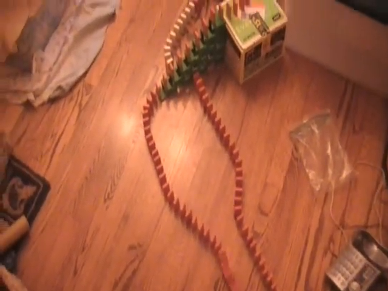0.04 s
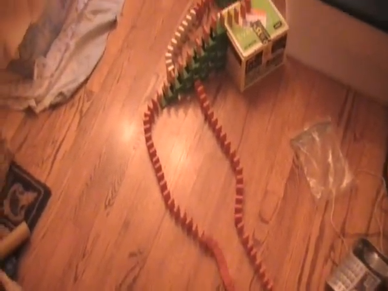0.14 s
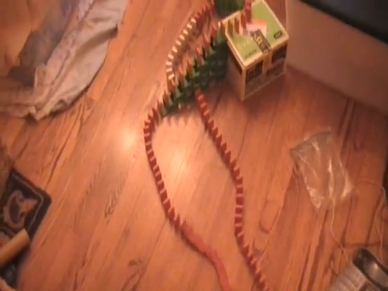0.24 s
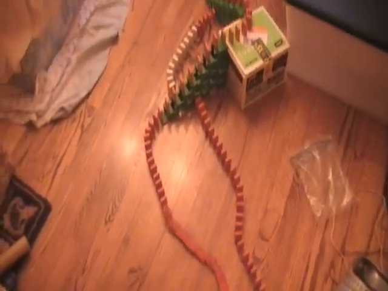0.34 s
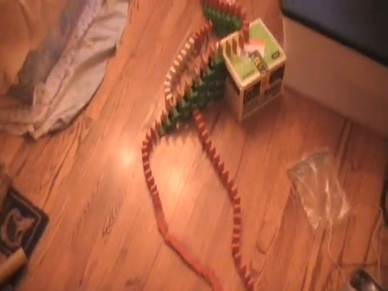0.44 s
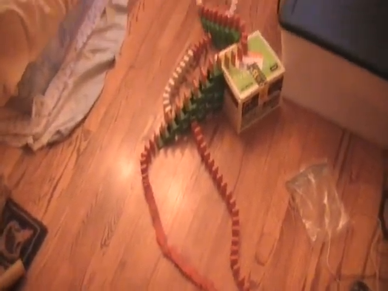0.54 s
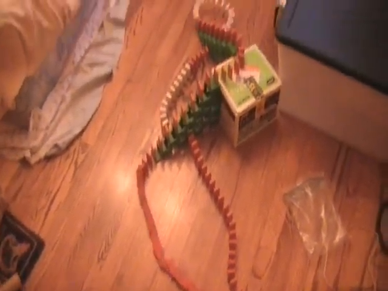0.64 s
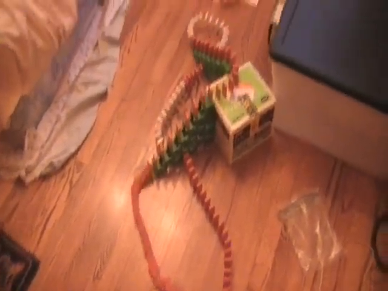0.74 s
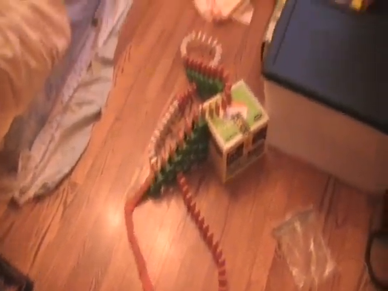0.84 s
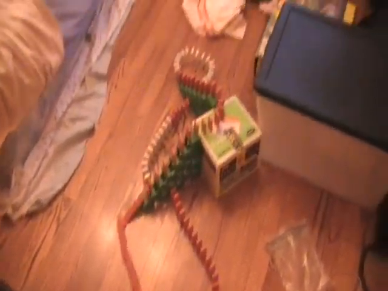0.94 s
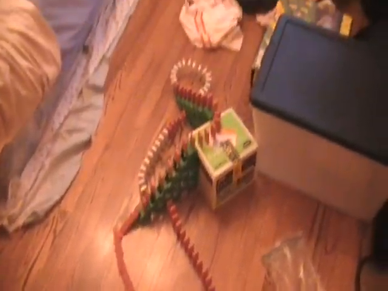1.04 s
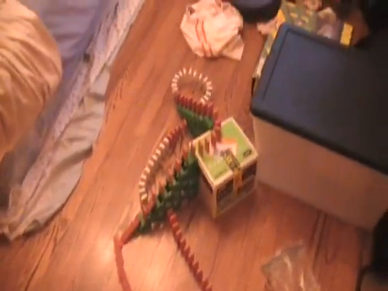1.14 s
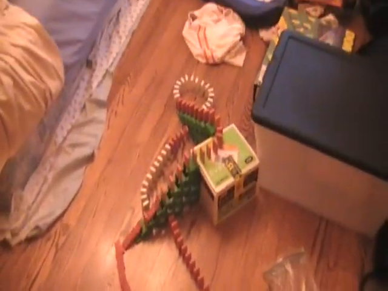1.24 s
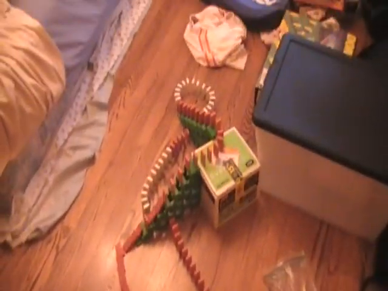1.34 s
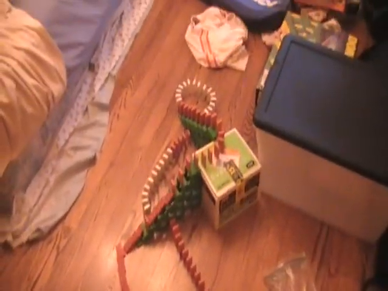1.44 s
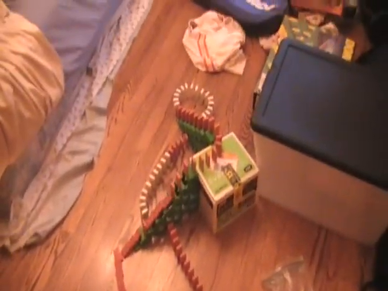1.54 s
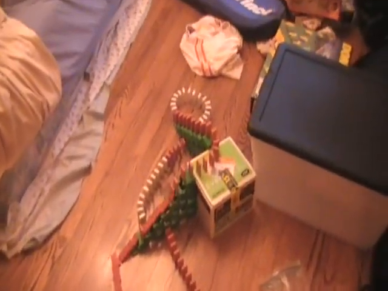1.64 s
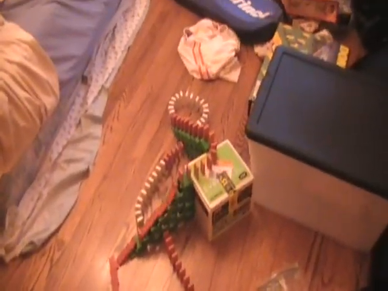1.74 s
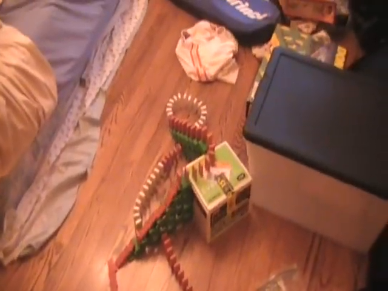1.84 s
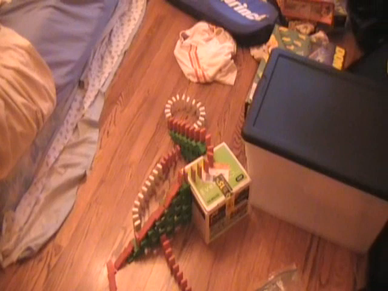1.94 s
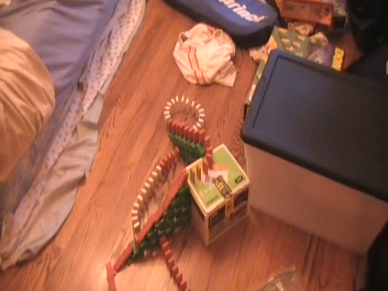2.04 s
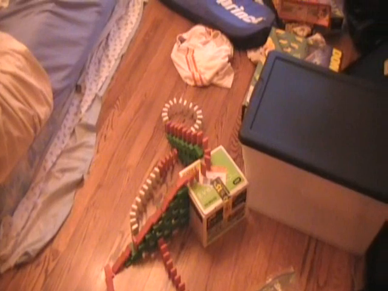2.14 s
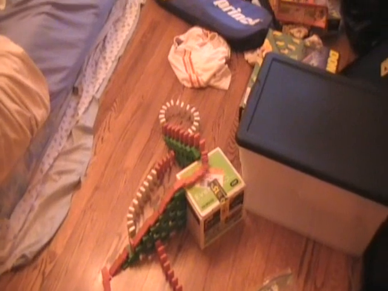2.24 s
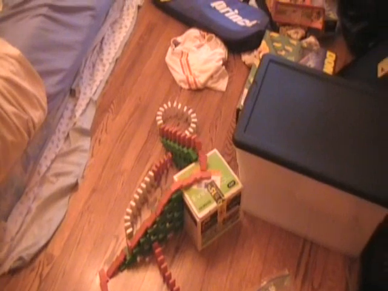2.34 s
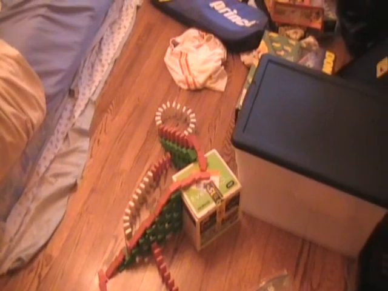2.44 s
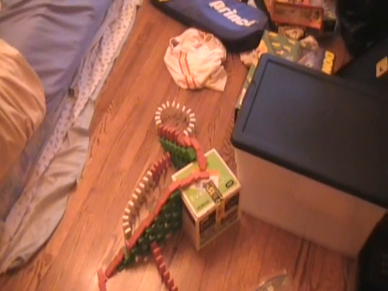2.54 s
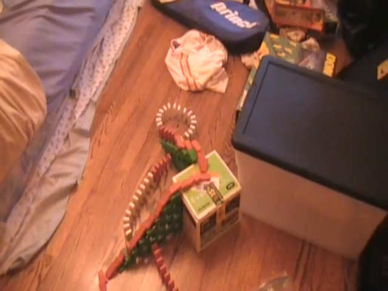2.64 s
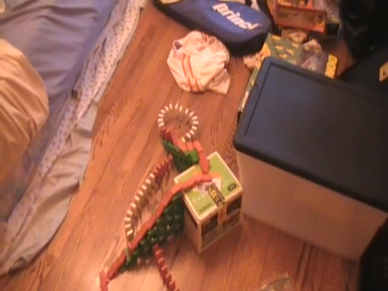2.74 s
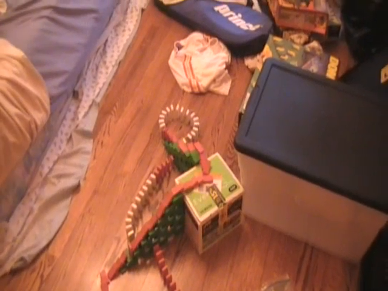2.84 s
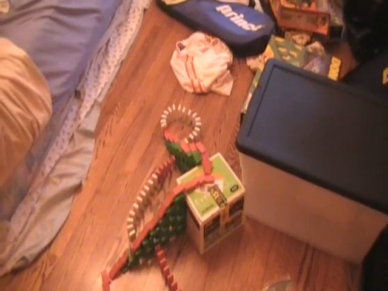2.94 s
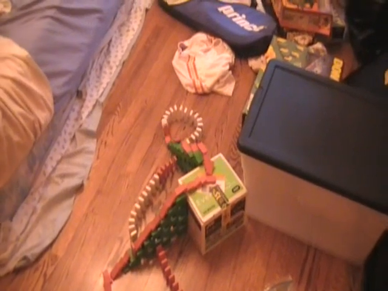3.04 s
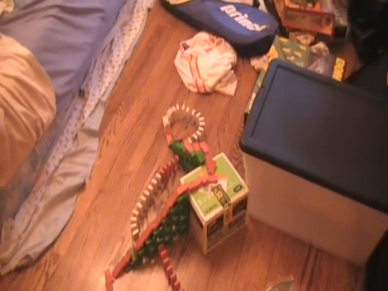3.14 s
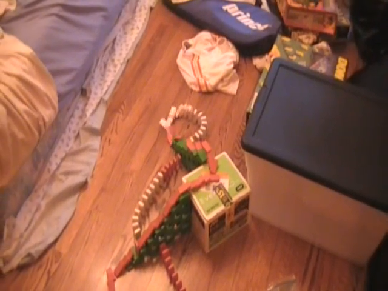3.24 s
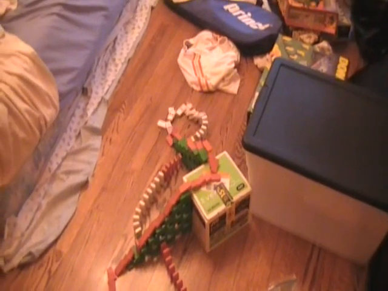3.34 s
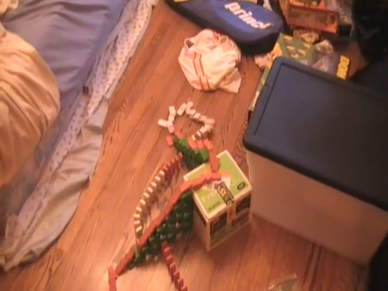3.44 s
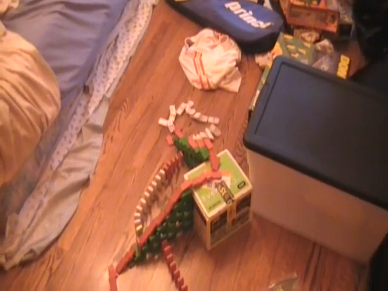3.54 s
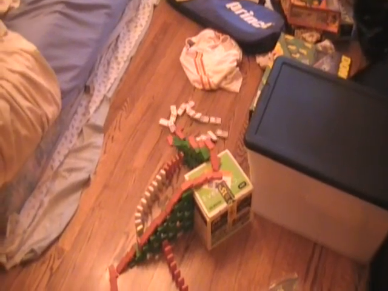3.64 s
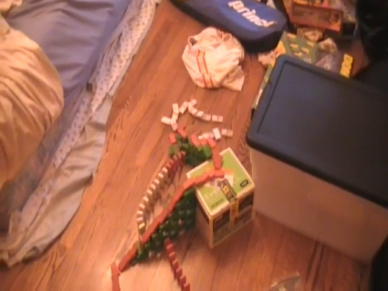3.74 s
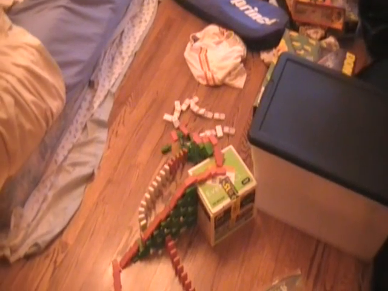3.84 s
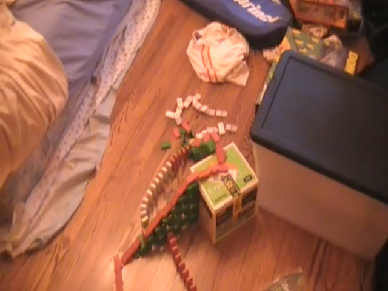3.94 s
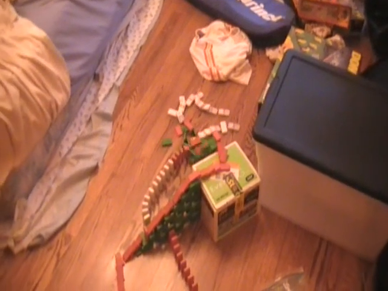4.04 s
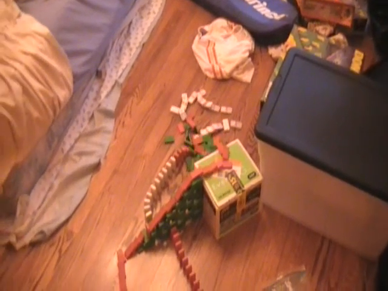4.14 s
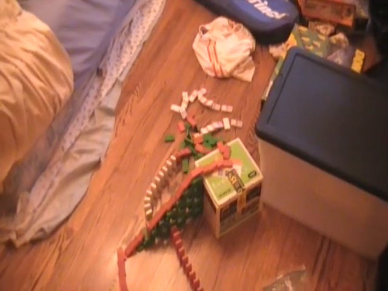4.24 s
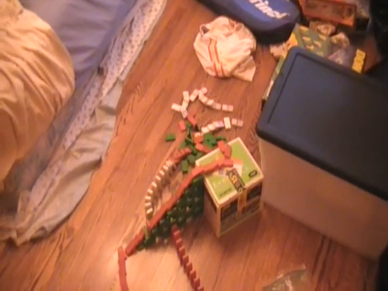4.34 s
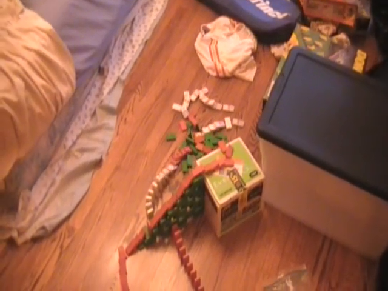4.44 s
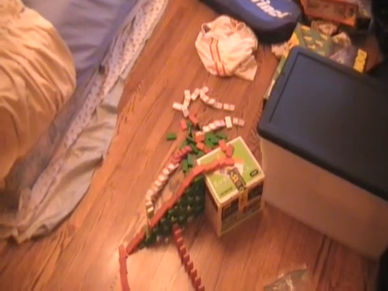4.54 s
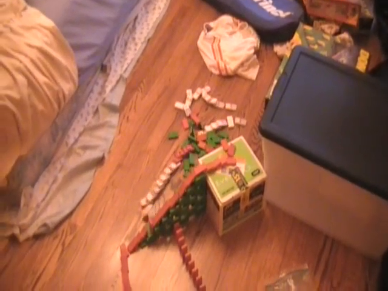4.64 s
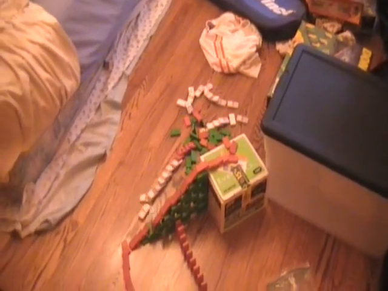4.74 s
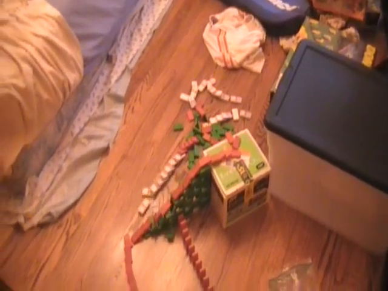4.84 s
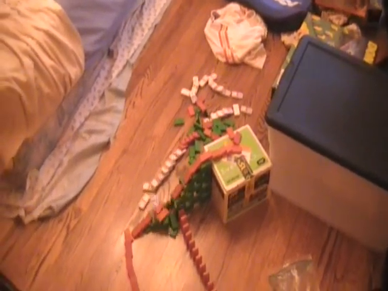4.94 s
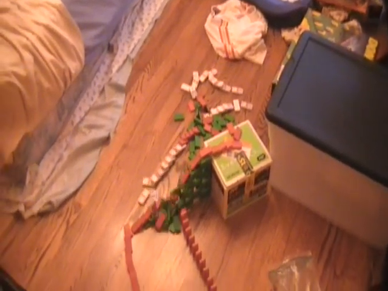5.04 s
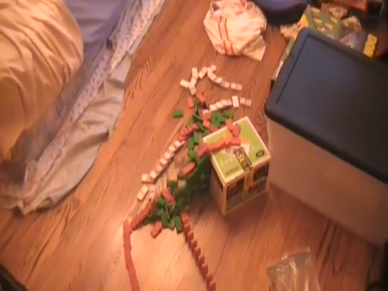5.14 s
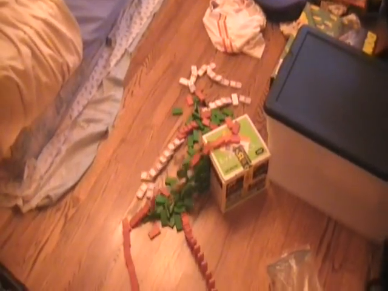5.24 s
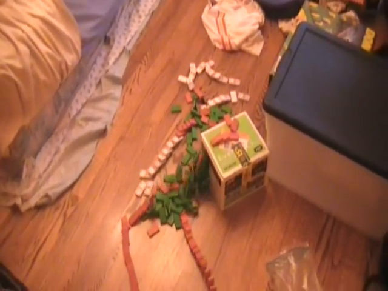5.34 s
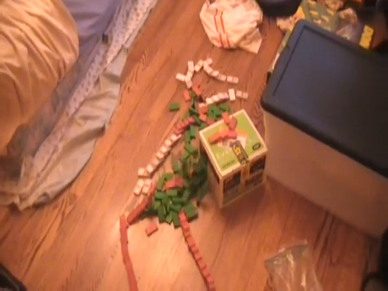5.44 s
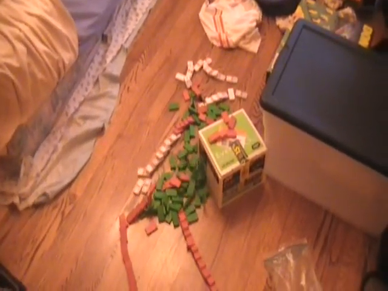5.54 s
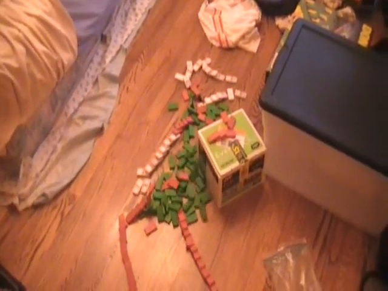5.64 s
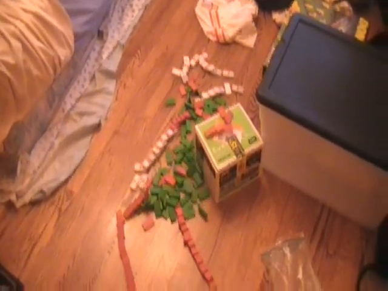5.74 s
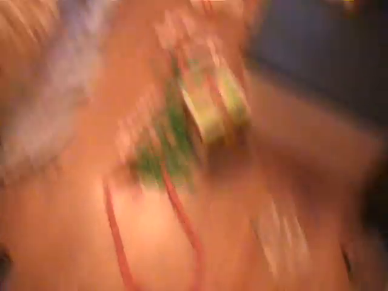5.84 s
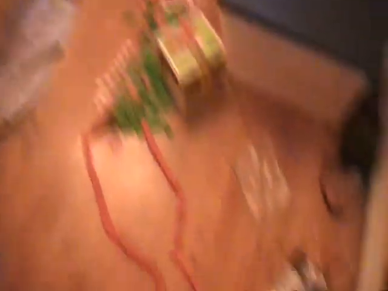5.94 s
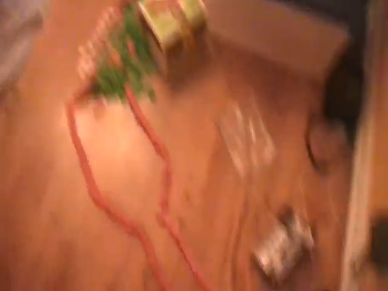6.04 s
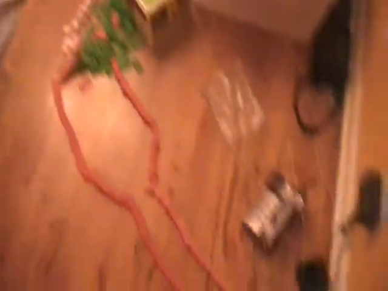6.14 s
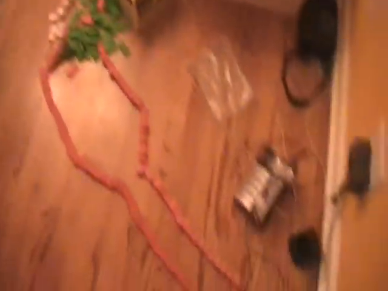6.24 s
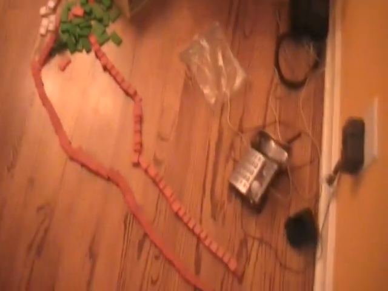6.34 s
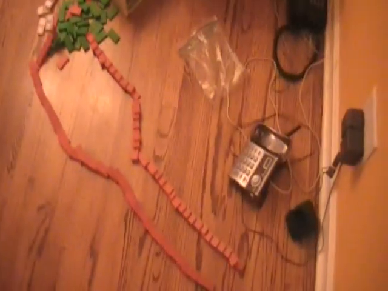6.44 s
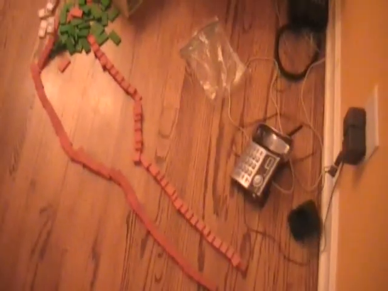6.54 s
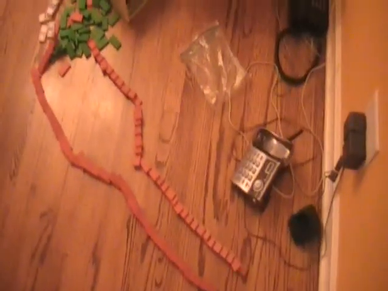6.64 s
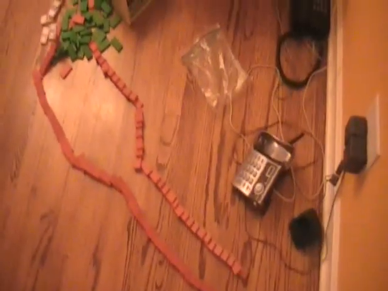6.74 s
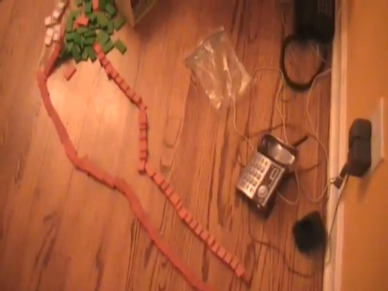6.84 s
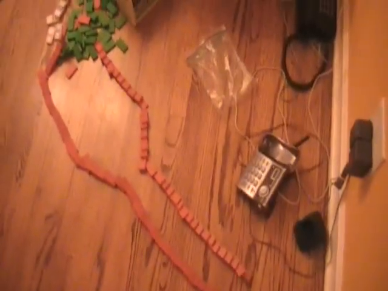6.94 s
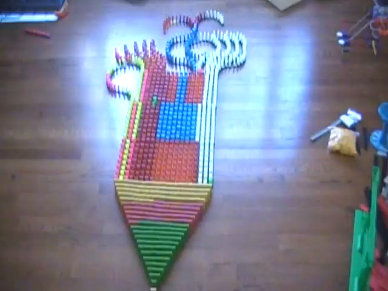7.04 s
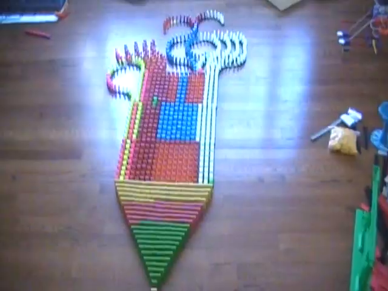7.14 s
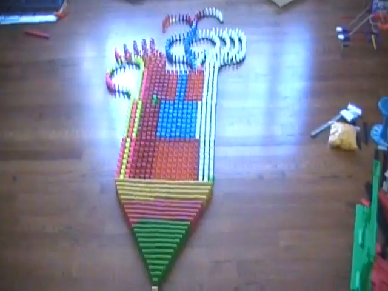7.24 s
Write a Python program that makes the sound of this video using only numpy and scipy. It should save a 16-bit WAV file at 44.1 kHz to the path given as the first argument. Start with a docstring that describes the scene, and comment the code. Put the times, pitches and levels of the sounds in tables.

```python
"""Dominoes topple on a wooden bedroom floor over room tone and hiss: first a quick chain, then a slow climb up
steps with knocks on a cardboard box, two collapsing stacks, a last chain, and ticks on a hand-held camera.
Each blow is an impulse plus a rough scrape that excites resonances: light tiles clack broadly, dense tiles ring,
floor boards and box boom under them. The room adds two early echoes and a short tail; the camera stays dry."""
import sys
import numpy as np
from scipy import signal
from scipy.fft import rfft, irfft
from scipy.io import wavfile
from scipy.ndimage import uniform_filter1d

SR = 44100
rng = np.random.default_rng(int(sys.argv[2]) if len(sys.argv) > 2 else 0)


def output_pcm(signal):
    """Save a mono or channel-first signal as 16-bit PCM at the path in sys.argv[1].

    Samples are clipped to [-1, 1] before scaling.
    """
    pcm = np.clip(np.atleast_2d(signal).T, -1, 1) * 32767
    wavfile.write(sys.argv[1], SR, np.round(pcm).astype(np.int16))


N = 321930

# Resonances of a light tile's edge. Each row: frequency in Hz, width in Hz, relative level in dB.
LIGHT_EDGE = [(7800, 700, 0), (6600, 700, -6), (9900, 1600, -21)]
# Resonances of the air in the box. Each row: frequency in Hz, width in Hz, relative level in dB.
BOX_AIR = [(389.5, 47, 0.5), (465, 52, -7), (548.5, 41, -8), (313, 12, -8.5)]
# Resonances of the cardboard lid. Each row: frequency in Hz, width in Hz, relative level in dB.
BOX_LID = [(887, 250, -8.5), (1397, 510, -9.5), (1950, 400, -6.5)]
# Runs of rattle. Each row: crest in seconds, swell in seconds, fade in seconds, nominal edge level at the crest
# in dB, then flat slaps, boards and box in dB relative to it, knocks per second, share of dense tiles (0-1).
RUNS = [(.05, 0.57, 0.7, -37, -2.5, -56, -24, 820, 0.06), (.74, 0.3, 0.28, -40, -1.5, -50, -5.5, 560, 0.01),
        (2.36, 0.15, 0.19, -39.5, 1.5, -1.5, 5.5, 1080, 0),
        (2.82, 0.28, 0.38, -34, -1.5, -10, -36.5, 530, 0.05),
        (3.309, 0.16, 0.72, -27.5, -8.5, -27.5, -47.5, 1510, 0.92),
        (3.719, 0.12, 0.29, -34.5, -1, -22.5, -28.5, 1050, 0.28),
        (4.222, 0.27, 0.42, -31.5, -3.5, -18.5, -18.5, 3300, 0.11),
        (4.58, 0.082, 0.18, -29.5, -12.5, -35, -34, 1900, 0.96),
        (4.8, 0.2, 0.32, -34.5, -4.5, -47, -22.5, 630, 0.58),
        (5.461, 0.6, 0.37, -32, -2.5, -25.5, -16.5, 1640, 0.16),
        (6.1, 0.56, 0.098, -41, -4, -47, -33, 840, 0.07)]

LEAD = 512  # samples kept ahead of the direct sound in a room reply
LEANS, LEAN_SAMPLES = 6, 512
LEAN_AT = np.repeat(rng.integers(0, LEANS, N // LEAN_SAMPLES + 1), LEAN_SAMPLES)[:N]  # lean of the struck tile
GRIT = rng.standard_normal(N)  # roughness of the touching faces


def gain_of(db):
    """Amplitude gain of a level in dB."""
    return 10 ** (np.asarray(db) / 20)


def evened(x):
    """Scale to an rms of 1."""
    return x / np.sqrt(np.mean(x ** 2) + 1e-20)


def read(points, hz):
    """Interpolate a (Hz, value) curve along log frequency."""
    f, value = np.transpose(points)
    return np.interp(np.log(hz + 1), np.log(f + 1), value)


def ring(modes, pitch=1, order=3):
    """Causal impulse response of steep resonances whose powers add, energy 1."""
    f = abs(np.fft.fftfreq(8192, 1 / SR))
    power = sum(gain_of(2 * db) / (1 + 0.6 * ((f - hz * pitch) / width) ** 2) ** order
                for hz, width, db in modes)
    log_gain = np.log(power + 1e-9) / 2
    minimum_phase = -signal.hilbert(log_gain).imag
    x = np.fft.ifft(np.exp(log_gain + 1j * minimum_phase)).real[:4096]
    return x / np.linalg.norm(x)


def force_db(peak_db, modes):
    """Level of the bare impulse that makes these modes ring up to peak_db."""
    return peak_db - 20 * np.log10(abs(ring(modes)).max())


def contact(seconds, db, scrape_s, rough=0.75):
    """Force of blows: a sharp impulse and a rough scrape that decays with time constant scrape_s."""
    impulses = np.zeros(N)
    at = np.clip((seconds * SR).astype(int), 0, N - 1)
    np.add.at(impulses, at, gain_of(db))
    decay = np.exp(-np.arange(400) / (scrape_s * SR))
    scrape = signal.oaconvolve(impulses, decay / np.linalg.norm(decay))[:N] * GRIT
    return impulses + rough * scrape


def hush():
    """Room tone and microphone hiss: shaped noise, partly shared by the channels, that sinks and then returns."""
    # Noise spectrum. Each row: frequency in Hz, relative level in dB.
    spectrum_db = [(25, -39), (54, -8.5), (87, -11.5), (173, -6.5), (353, -6.5), (907, -12.5),
                   (1080, -15.5), (7700, -25), (11000, -41.5), (14300, -83.5)]
    # Course of the noise. Each row: time in seconds, rms level in dB.
    course_db = [(2.2, -48), (6.5, -53), (6.75, -53.5), (7.3, -52)]
    even_n = N + N % 2
    z = rfft(rng.standard_normal((2, even_n)))
    hz = np.fft.rfftfreq(even_n, 1 / SR)
    shared = np.array([z[0], 0.3 * z[0] + 0.95 * z[1]])
    level = gain_of(np.interp(np.arange(N) / SR, *np.transpose(course_db)))
    noise = evened(irfft(shared * gain_of(read(spectrum_db, hz))))
    return level * noise[:, :N]


def pair(z):
    """Two spectra as alike as close microphone ports allow; the unlike part is a quarter turn early or late."""
    # Each row: frequency in Hz, left-right likeness (0-1).
    likeness = [(60, 0.072), (180, 0.91), (550, 0.9), (5000, 0.79), (6500, 0.96), (8500, 0.026),
                (12000, 0.6)]
    # Each row: frequency in Hz, left minus right in dB.
    left_minus_right_db = [(100, 4.5), (600, 3), (2000, 0.4), (8000, -1)]
    hz = np.fft.rfftfreq(2 * len(z[0]) - 2, 1 / SR)
    same = np.clip(read(likeness, hz), 0, 1)
    tilt = gain_of(read(left_minus_right_db, hz) / 2)
    unlike = rng.choice([-1j, 1j]) * np.sqrt(1 - same ** 2) * z[1]
    return np.array([z[0] * tilt, (same * z[0] + unlike) / tilt])


def reply():
    """Room impulse response: direct sound, two early echoes, and sparse taps dying band by band."""
    # Decay of the tail. Each row: frequency in Hz, time to fall 60 dB in seconds.
    t60_s = [(200, 0.067), (530, 0.54), (1390, 0.5), (3680, 0.48), (9700, 0.4)]
    # Colour of the tail. Each row: frequency in Hz, relative level in dB.
    colour_db = [(300, 9.5), (1500, 4), (4500, 3), (9000, 0)]
    tail_db, build_s = -3, 0.0023  # the tail gathers as far walls answer
    echo_s, echo_db = 0.0122, -15.5  # to and fro between hard faces nearby
    taps = np.zeros((2, SR))
    at = np.arange(200, SR - 20, 20) + rng.integers(0, 20, (2, (SR - 201) // 20))
    np.put_along_axis(taps, at, rng.choice([-1., 1.], at.shape), 1)
    hz, t, z = signal.stft(taps, SR, nperseg=256)
    band_db = read(colour_db, hz)[:, None] - 60 * t / read(t60_s, hz)[:, None]
    tail = signal.istft(z * gain_of(band_db), SR, nperseg=256)[1][:, :SR]
    tail *= 1 - np.exp(-np.arange(SR) / (build_s * SR))
    tail *= gain_of(tail_db) / np.linalg.norm(tail[0])
    tail[:, 0] += 1  # direct sound
    for trips in (1, 2):
        tail[:, round(trips * echo_s * SR)] += gain_of(echo_db)
    return np.roll(irfft(pair(rfft(tail))), LEAD, 1)


def room(x):
    """Blows land in changing places, so three replies of the room take turns."""
    turn = 2 * np.pi * 2.3 * np.arange(N) / SR  # 2.3 rounds a second
    shares = [np.maximum(np.cos(turn + 2 * np.pi * k / 3) + 0.5, 0) for k in range(3)]
    total = np.sqrt(sum(w ** 2 for w in shares))
    return sum(signal.fftconvolve((x * w / total)[None], reply(), axes=1)[:, LEAD:LEAD + N] for w in shares)


def camera():
    """Fingers tick on the camera, dry and close: blows ring its casing and, rougher, its button."""
    # Each row: start in seconds, level in dB, treble in dB relative to it.
    ticks = [(6.579, -33.5, -19), (6.822, -37, -22), (6.854, -29, -30), (6.886, -36.5, -22), (7.1, -23, -9)]
    # Camera body. Each row: frequency in Hz, width in Hz, relative level in dB.
    casing = [(153, 50, 4.5), (730, 214, 3), (2040, 240, 1), (3020, 270, -10)]
    # Camera button. Each row: frequency in Hz, width in Hz, relative level in dB.
    button = [(5500, 500, 7), (3760, 490, 6), (7900, 1000, -5)]
    s, db, treble_db = np.transpose(ticks)
    body_force = contact(s, force_db(db, casing), 0.0048, rough=0.81)
    button_force = contact(s, force_db(db + treble_db, button), 0.0023, rough=4.8)
    return (signal.oaconvolve(body_force, ring(casing)) + signal.oaconvolve(button_force, ring(button)))[:N]


def box():
    """Tiles drop flat on hollow cardboard; the lid rings and the air inside takes some milliseconds to swell."""
    # Each row: start in seconds, hollow level in dB, lid in dB relative to it.
    knocks = [(1.066, -34.5, -1.5), (2.201, -20.5, -6), (2.286, -25.5, 5), (2.295, -14.5, -10.5),
              (2.319, -21.5, 8.5), (2.368, -27, 2.5), (2.399, -19.5, 10.5), (2.413, -39, 26.5),
              (3.607, -24, 10), (4.263, -19, -8), (4.298, -22.5, -4.5), (5.46, -14.5, -6),
              (5.483, -23.5, -8), (6.217, -42, 21), (6.233, -29.5, 1)]
    s, db, lid_db = np.transpose(knocks)
    air_force = contact(s, force_db(db, BOX_AIR), 0.0037, rough=0.12)
    lid_force = contact(s, force_db(db + lid_db, BOX_LID), 0.0091, rough=1.45)
    air = signal.oaconvolve(air_force, ring(BOX_AIR, order=5))
    return (air + signal.oaconvolve(lid_force, ring(BOX_LID)))[:N]


def dense_share():
    """Share of dense tiles among those falling at each moment, smoothed over 0.1 s."""
    t = np.arange(N) / SR
    share = np.max([dense * (t > crest - swell) * (t < crest + fade)
                    for crest, swell, fade, *_, dense in RUNS], axis=0)
    return np.clip(uniform_filter1d(share, size=SR // 10), 0, 1)


def leaning(modes, pitch, favour_db):
    """Ring of a tile that leans its own way: a little off pitch, its modes unevenly struck."""
    uneven = [(hz, width, db + favour_db * rng.standard_normal()) for hz, width, db in modes]
    return ring(uneven, pitch)


def tiles(s, edge_db, slap_db, boards_db, box_db, damped=1, favour_db=5):
    """Blows ring the tile edge, its flat face, the floor boards and the box nearby."""
    # Resonances of dense edge, light face, dense face and floor boards.
    # Each row: frequency in Hz, width in Hz, relative level in dB.
    dense_edge = [(8330, 200, 0), (8620, 200, -3), (9480, 260, -9), (6900, 1300, -13), (10300, 700, -24)]
    light_face = [(4150, 330, 16), (5350, 900, 10.5), (1474, 1470, 9), (2950, 770, 7)]
    dense_face = [(3030, 850, 3), (1600, 1270, 0.5), (5333, 1230, 5.5)]
    boards = [(185, 20, 12), (253, 120, -1.5), (306.6, 4.8, -0.5), (680, 540, 1), (1120, 58, 4.5)]
    lid_db = -34.5  # lid against the air of the box
    dense = dense_share()
    edge = contact(s, edge_db - 5, 0.0018, rough=1.6)  # mostly scrape
    slap = contact(s, edge_db + slap_db - 3, 0.0025, rough=1.5)
    floor = contact(s, edge_db + boards_db, 0.0023)
    hollow = contact(s, edge_db + box_db, 0.00034)
    parts = [(edge * np.sqrt(dense), ring(dense_edge)),
             (slap * np.sqrt(dense), ring(dense_face)),
             (floor, ring(boards)),
             (hollow, ring(BOX_AIR) + gain_of(lid_db) * ring(BOX_LID))]
    for lean, pitch in enumerate(np.linspace(0.95, 1.05, LEAN_AT.max() + 1)):
        light = np.sqrt(1 - dense) * (LEAN_AT == lean)
        parts.append((edge * light, leaning(LIGHT_EDGE, pitch * damped, 2.1)))
        parts.append((slap * light, leaning(light_face, np.sqrt(pitch), favour_db)))
    return sum(signal.oaconvolve(force, modes)[:N] for force, modes in parts)


def rattle():
    """Many small uneven knocks among sliding and settling tiles; the more there are, the smaller each."""
    uneven_db, largest = 8.5, 2.6  # spread of knock sizes; their cap in spreads
    arch_db, bend = 19.5, 2.34  # fall one swell before or one fade after the crest; power of the curve
    t, knocks = np.arange(N) / SR, []
    size_db = uneven_db * np.minimum(rng.exponential(1, N), largest)
    size_db -= 10 * np.log10(np.mean(gain_of(2 * size_db)))  # mean power 1
    for crest, swell, fade, level_db, slap_db, boards_db, box_db, per_s, _ in RUNS:
        at = np.flatnonzero(rng.random(N) < per_s / SR)
        s = t[at]
        fall_db = arch_db * (abs(s - crest) / np.where(s < crest, swell, fade)) ** bend
        edge_db = level_db - np.minimum(fall_db, 200) + size_db[at] + 10 * np.log10(SR / per_s)
        knocks.append([s, edge_db, 0 * s + slap_db, 0 * s + boards_db, 0 * s + box_db])
    # edges of heaped tiles ring lower than those of standing ones
    return tiles(*np.concatenate(knocks, axis=1), damped=0.937, favour_db=2)


def clacks():
    """Each falling tile strikes, then rebounds twice a few milliseconds later."""
    # Clear clacks. Each row: start in seconds, nominal edge level in dB, flat slap in dB relative to it.
    strikes = [(0.014, -13, -3), (0.0226, -11, -12), (0.0461, -14, -3), (0.0726, -11, -8.5),
               (0.0996, -11, -9), (0.1331, -5, -9), (0.158, -18.5, -25), (0.186, -6.5, -30.5),
               (0.2035, -31.5, -29), (0.2175, -18.5, -33), (0.2431, -8, -43), (0.2764, -7.5, -24.5),
               (0.305, -15, -25), (0.3327, -8.5, -19), (0.3647, -10, -27), (0.4, -9, -17.5),
               (0.4246, -16.5, 2), (0.494, -10, -9.5), (0.533, -8, -13.5), (0.591, -1, -20),
               (0.6479, -13.5, -0.5), (0.679, -7, -39), (0.708, -6, -30), (0.7951, -8.5, -49),
               (0.8564, -9.5, -2.5), (0.9551, -16, -29), (1.058, -31, 3), (1.1995, -23.5, 3.5),
               (1.3687, -16, -2.5), (1.5304, -9, -4.5), (1.767, -30, 1.5), (1.7777, -26.5, 1.5),
               (1.9359, -21, 3), (1.9783, -25.5, 0.5), (2.085, -23, -10), (2.1984, -4, -6.5),
               (2.2491, -1.5, -14), (2.369, -10, 1.5), (2.468, -11.5, -3), (2.544, -16, 1.5),
               (2.607, -6.5, -3), (2.673, -4, -5), (2.7203, -14, -22), (2.7442, -3, -7), (2.8, -16, -21.5),
               (2.82, -14, -10.5), (2.828, -6.5, -13), (2.89, -13.5, -9), (2.9175, -13, 3.5),
               (2.9256, -3, -17.5), (2.963, -6, -11), (2.9916, -8, 0.5), (3.042, -5.5, -2.5),
               (3.066, -3.5, -13.5), (3.069, -4, -14), (3.1337, -12, -23), (3.1953, -18, 4),
               (3.221, -9.5, -3), (3.261, -4.5, -27), (3.281, -4.5, -10.5), (3.332, -6, -22),
               (3.35, -10, -0.5), (3.363, -6, -28), (3.3873, -12.5, 3.5), (3.466, -14, -14.5),
               (3.563, -7, -0.5), (3.603, -11.5, -8), (3.6966, -16, -6), (3.825, -21.5, 10),
               (3.848, -15, -15.5), (4.002, -15, 2.5), (4.03, -7.5, -2.5), (4.1814, -6, -7),
               (4.211, -10.5, -16), (4.2745, -8.5, -9.5), (4.487, -8, -14), (4.5012, -2, -13.5),
               (4.538, -8.5, -14), (4.57, -4.5, -10), (4.6195, -2.5, -38), (4.695, -5, -32.5),
               (4.748, -5, -4), (4.762, -9.5, 3), (4.7833, -1.5, -10), (4.804, -1, -22.5),
               (4.9204, -4.5, -11), (5.011, -9, -6), (5.107, -14.5, -8), (5.2318, -9.5, 0.5),
               (5.2853, -6, -14), (5.3368, -8.5, -12.5), (5.3682, -6, -8), (5.4256, -19, 6.5),
               (5.438, -1, -9.5), (5.545, -7, -13), (5.593, -5.5, -43), (5.6478, -4.5, -21),
               (5.7757, -12, -6), (5.8413, -13.5, -21), (5.8665, -13, -29), (5.893, -11.5, -7),
               (5.914, -8, -15), (5.94, -12.5, -13), (5.965, -17, -21), (5.9957, -7.5, -26),
               (6.0247, -15, -37), (6.0459, -2.5, -16.5), (6.0674, -26, -9), (6.091, -5, -13),
               (6.12, -11.5, -15), (6.136, -6.5, -15), (6.1597, -5.5, -14), (6.22, -11.5, -6),
               (6.2334, -11, -4.5), (6.2604, -16.5, -3)]
    # on steps and in heaps, tiles are caught and rebound weaker
    steps_start_s, steps_end_s, step_db = 0.9, 6.4, -5
    s, edge_db, slap_db = np.tile(np.transpose(strikes), 3)
    chance = rng.random((len(strikes), 4)).T
    none = 0 * chance[0]
    later_s = np.concatenate([none, 0.0018 + 0.001 * chance[0], 0.0044 + 0.0015 * chance[1]])
    weaker_db = np.concatenate([none, -0.8 - 7 * chance[2], -3.5 - 9 * chance[3]])
    weaker_db += step_db * (later_s > 0) * (s > steps_start_s) * (s < steps_end_s)
    blow_db = force_db(edge_db + weaker_db, LIGHT_EDGE)
    return tiles(s + later_s, blow_db, slap_db, boards_db=slap_db - 18.5, box_db=slap_db - 43.0)


def scene():
    """Tiles and box sound in the room; camera ticks and hush are added without it."""
    thin = signal.butter(6, 145, "high", fs=SR, output="sos")  # the blows carry no deep bass below about 145 Hz
    blows = clacks() + box() + rattle()
    return room(signal.sosfilt(thin, blows)) + camera() + hush()


def record(dry):
    """Microphone colour, then the band limit."""
    # Microphone response. Each row: frequency in Hz, gain in dB.
    response_db = [(9000, -2), (12000, 3), (16000, -7)]
    edge_hz = 16400
    hz = np.fft.rfftfreq(1024, 1 / SR)
    colour = np.roll(irfft(gain_of(read(response_db, hz))), 512) * np.hanning(1024)
    coloured = signal.oaconvolve(dry, colour[None], "same")
    band_limit = signal.firwin(511, edge_hz, window=("kaiser", 9), fs=SR)
    return signal.oaconvolve(coloured, band_limit[None], "same")


dry = scene()
out = record(dry)
output_pcm(out)
```